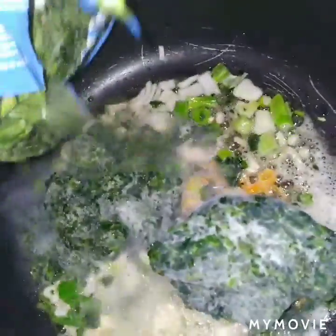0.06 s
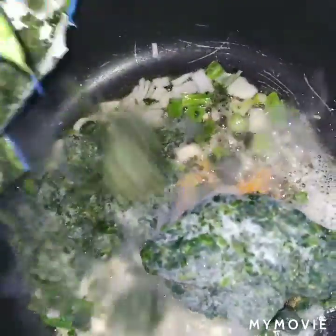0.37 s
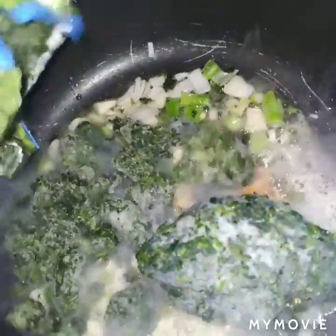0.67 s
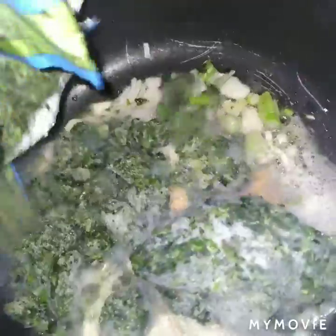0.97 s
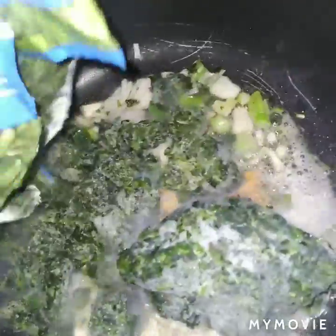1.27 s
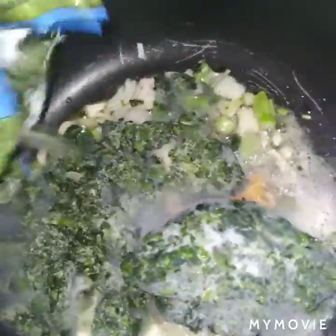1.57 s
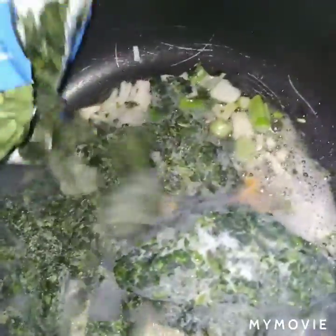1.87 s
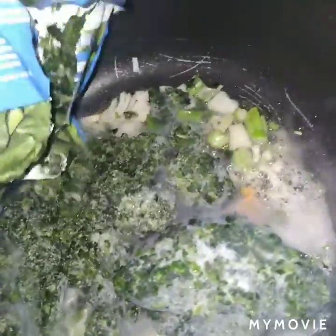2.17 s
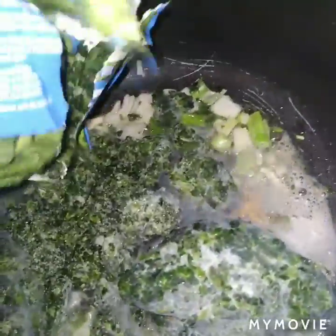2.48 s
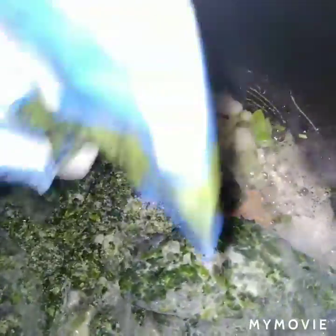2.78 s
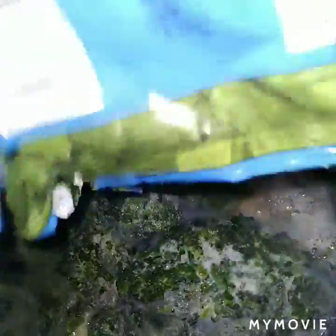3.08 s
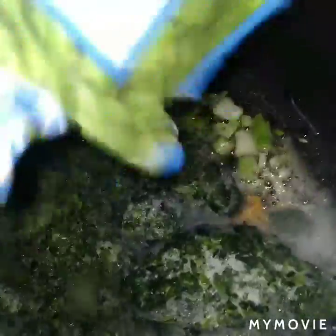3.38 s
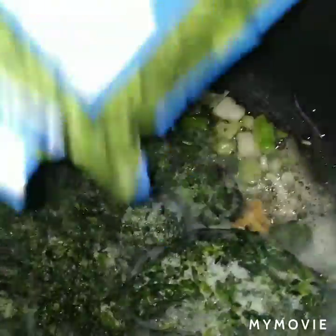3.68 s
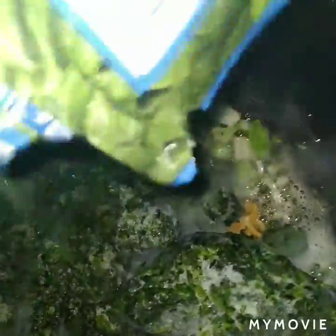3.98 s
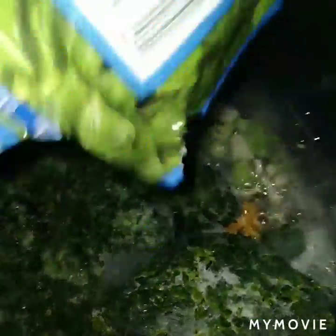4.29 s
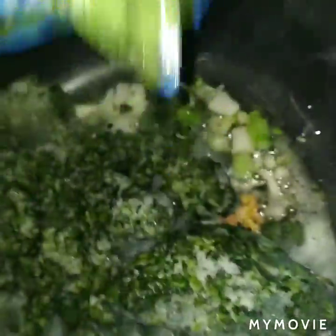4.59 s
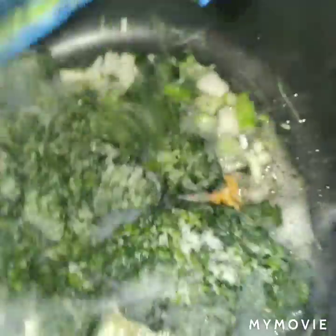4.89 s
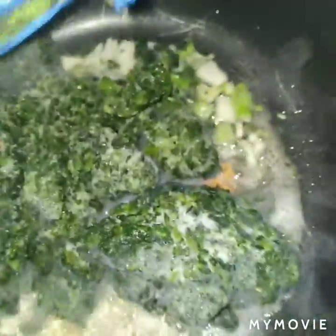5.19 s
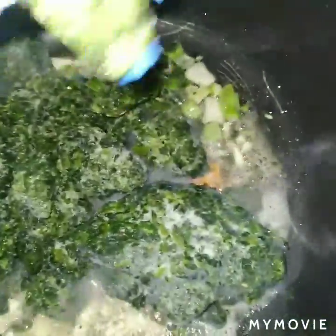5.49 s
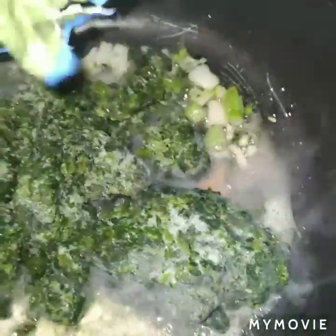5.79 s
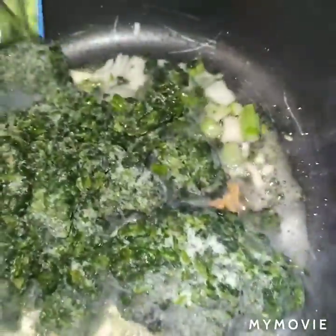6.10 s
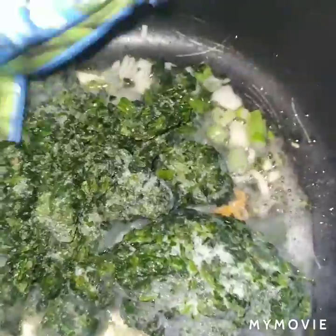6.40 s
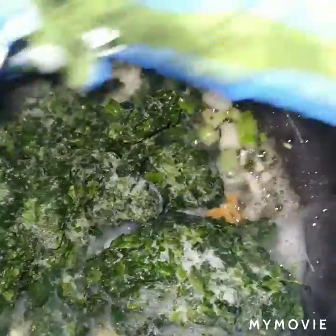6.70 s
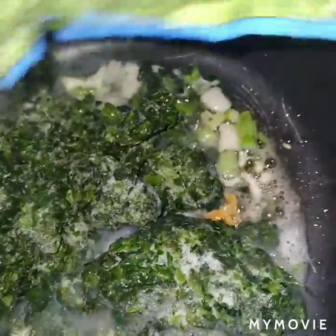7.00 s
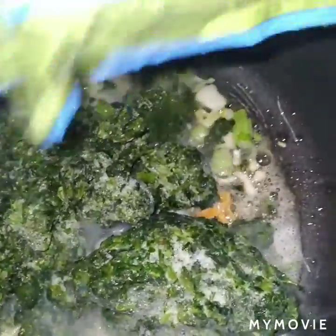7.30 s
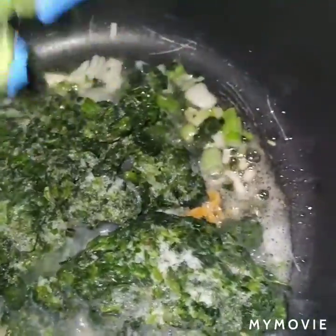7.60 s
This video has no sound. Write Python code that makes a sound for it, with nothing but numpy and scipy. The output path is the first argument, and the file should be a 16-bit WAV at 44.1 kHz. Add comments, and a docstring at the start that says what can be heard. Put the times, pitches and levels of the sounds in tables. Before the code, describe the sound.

Oil sizzles around onions in a pan for the whole eight seconds, a close, fine, high hiss with tiny spits that grows slightly toward 7 seconds. Over it, a plastic bag of frozen spinach is shaken in irregular fits. Sharp crinkles and snaps come from about 0.2 to 0.7 seconds, with several soft, dull knocks as clumps drop around 0.5. Lighter ticks and pats follow. The loudest crackling comes between 2.6 and 3.3 seconds, with low flapping and frozen crumbs scraping and tumbling inside the bag. Gentler shakes and knocks continue until about 4.7, then the bag quietens and the sizzle dominates. Another cluster of rustles, snaps and landing clumps runs from 5.9 to 7 seconds, with a last few snaps and a flap near 7.6. The pan lends a faint hollow ring, and the small kitchen adds a short echo and a very faint low hush.

```python
"""Oil fizzes and spits around onions in a pan, as countless tiny steam bubbles burst.
Frozen spinach is shaken in from a plastic bag, whose creases snap and crinkle as they buckle.
Frozen crumbs scratch and tumble inside the flapping bag, and clumps knock softly against it
and drop into the pan. The hollow of the pan rings along with the bag and the spinach,
and the small kitchen adds a short echo and a low hush."""
import sys
import numpy as np
from scipy import signal
from scipy.fft import rfft, irfft
from scipy.io import wavfile

SR = 44100
rng = np.random.default_rng(int(sys.argv[2]) if len(sys.argv) > 2 else 0)


def master(y):
    """Save y as 16-bit WAV."""
    cut = np.clip(np.atleast_2d(y).T, -1, 1)
    pcm = np.round(cut * 32767)  # scale
    wavfile.write(sys.argv[1], SR, pcm.astype(np.int16))


N = 346185
TIME = np.arange(N) / SR

# The sizzle grows as the spinach thaws: (time [s], level [dB])
SIZZLE_LEVELS = [(0, -50.5), (2.4, -49), (4.6, -47), (7, -46.5), (7.85, -49)]
# Tone of the bubbling oil: (frequency [Hz], relative level [dB])
SIZZLE_TONE = [(290, -49), (500, -7), (638, -39), (863, -18.5), (1200, -20), (1880, -21.5), (2010, -10),
               (2360, -7), (2760, -8.5), (3190, -7.5), (4500, -7), (7030, 5), (9790, 3.5), (11800, -9),
               (15500, -12.5)]
# The louder creases of the bag snap over:
# (time [s], tick level [dB], tick pitch [Hz], panel level [dB], panel pitch [Hz])
SNAPS = [(0.171, -39, 9700, -65, 3200), (0.2, -50, 9000, -48, 3300), (0.206, -25.5, 8900, -35.5, 2150),
         (0.216, -31, 6740, -36, 2250), (0.226, -34, 8160, -53, 2700), (0.243, -28, 8500, -63, 2700),
         (0.3558, -28, 6360, -44, 4100), (0.3639, -32, 6850, -34.5, 2580), (0.4717, -28, 8600, -25, 2540),
         (0.4878, -32, 7100, -61, 2200), (0.508, -36, 7600, -59, 1310), (0.544, -37, 7350, -69, 1700),
         (0.5756, -34, 6840, -77, 1600), (0.58, -28, 7400, -78, 3000), (0.5837, -30.5, 8100, -73, 2300),
         (0.687, -28.5, 7700, -73, 3270), (0.696, -34.5, 8750, -64, 3400), (0.819, -41.5, 9000, -77, 3540),
         (1.055, -35, 6400, -52, 3020), (1.0807, -34, 6470, -75, 1300), (1.129, -38.5, 7900, -70, 2400),
         (1.31, -39.5, 5540, -76, 3000), (1.4215, -28, 6540, -44, 2940), (1.4355, -27.5, 6800, -43.5, 2760),
         (1.69, -37.5, 7150, -49.5, 3700), (1.7121, -35, 6400, -71, 2500), (1.8152, -36, 8700, -49.5, 2500),
         (1.911, -59, 7400, -41, 1740), (2.074, -28.5, 7400, -64, 3100), (2.218, -35.5, 8150, -58, 2800),
         (2.245, -37, 7300, -70, 4000), (2.501, -37, 8700, -34.5, 2200), (2.6951, -37, 7800, -31, 2450),
         (2.706, -29, 6850, -38, 2250), (2.7186, -20.5, 8500, -20.5, 3220), (2.7403, -28, 6700, -41, 2400),
         (2.7496, -26, 6640, -53, 3200), (2.754, -21.5, 8550, -50, 3200), (2.7903, -26.5, 7360, -51, 2000),
         (2.8297, -35, 8100, -48, 1880), (2.8863, -28.5, 7050, -38, 1500), (2.91, -29.5, 8340, -46, 2400),
         (3.004, -44.5, 7500, -36, 1500), (3.108, -41, 7600, -46, 3270), (3.1246, -22, 8860, -37, 2780),
         (3.2166, -24, 7200, -31.5, 3750), (3.2225, -20, 8800, -33.5, 2500),
         (3.2434, -25.5, 9100, -65, 2700), (3.4996, -35.5, 9400, -70, 1500),
         (3.5612, -35, 8440, -34.5, 1900), (3.588, -45, 8200, -42, 1820), (4.174, -38.5, 5900, -40.5, 1660),
         (4.267, -30, 8300, -66, 3600), (4.3357, -34.5, 5660, -48, 3370), (4.4014, -36, 8550, -56, 2500),
         (4.638, -35.5, 7150, -69, 1000), (4.997, -60, 8100, -42, 3250), (5.2167, -62, 7700, -44, 1230),
         (5.709, -58, 7500, -50.5, 2950), (5.9655, -61, 7500, -42, 2000), (6.013, -33, 6500, -30, 1960),
         (6.023, -29, 7900, -30.5, 3000), (6.0472, -37, 6560, -38, 2900), (6.0667, -38, 6000, -28.5, 2100),
         (6.1073, -49, 7540, -33, 1850), (6.1322, -38, 5840, -34.5, 2050), (6.2056, -50, 7160, -38.5, 2060),
         (6.5369, -33.5, 8300, -39, 2580), (6.567, -34.5, 8900, -56, 2580), (6.624, -48, 7400, -33, 3400),
         (6.6346, -53, 6900, -33.5, 1670), (6.677, -61, 8100, -37, 2500), (6.7622, -39, 6100, -33.5, 1820),
         (7.0012, -34, 6440, -39.5, 2600), (7.3767, -39.5, 9400, -48, 1410),
         (7.5193, -43, 7100, -46.5, 2520), (7.555, -26, 7900, -55, 3300), (7.5872, -30, 8300, -55, 3200)]
# Bright tone of the thin plastic: (frequency [Hz], relative level [dB])
PLASTIC_TONE = [(1500, -51), (2600, -28), (4600, -10), (5300, 1.5), (6500, 0.5), (8800, 2.5), (9800, 0),
                (11200, -9.5), (15500, -32)]
# The bag is shaken or shifted:
# (time [s], length [s], rustle level [dB], flap level [dB], tumble level [dB])
SHAKES = [(0.039, 0.0067, -59.5, -49, -66), (0.178, 0.13, -53.5, -70.5, -61), (0.413, 0.14, -82, -55, -56),
          (0.676, .1, -66.5, -62, -82), (0.918, 0.16, -60.5, -69.5, -65), (1.457, 0.085, -72, -71, -68),
          (1.631, 0.08, -57.5, -57.5, -59.5), (1.896, .1, -56, -59, -60.5), (2.374, 0.15, -56, -71, -61),
          (2.632, 0.089, -55, -56, -41.5), (2.691, 0.098, -49.5, -51.5, -47),
          (2.884, 0.025, -58, -48, -45.5), (2.969, 0.064, -52.5, -47, -51.5),
          (3.063, 0.068, -61, -52, -52.5), (3.217, 0.021, -50, -52.5, -49), (3.387, 0.14, -65, -55.5, -59),
          (3.57, 0.18, -59.5, -53.5, -60), (3.77, 0.21, -58.5, -59.5, -61.5),
          (4.124, 0.081, -58, -52.5, -57), (4.447, 0.019, -60, -54.5, -54), (4.586, 0.15, -62.5, -70, -68),
          (4.786, 0.13, -63.5, -78, -75.5), (5.151, 0.042, -53.5, -63.5, -66),
          (5.51, 0.064, -79, -52.5, -68), (5.891, 0.05, -51.5, -65, -66.5), (5.965, 0.14, -42, -48, -49.5),
          (6.125, 0.092, -50.5, -53, -57.5), (6.416, 0.094, -57.5, -57, -58),
          (6.506, 0.095, -49.5, -61, -61.5), (6.631, 0.041, -55, -47.5, -47.5),
          (6.769, 0.0097, -68, -52, -47.5), (6.998, 0.019, -52.5, -50, -48),
          (7.036, 0.27, -66.5, -54, -69.5), (7.602, 0.045, -60, -46, -56), (7.695, 0.039, -74, -53.5, -64)]
# Tone of rustling crumbs and coarse creases: (frequency [Hz], relative level [dB])
RUSTLE_TONE = [(450, -36), (850, 1.5), (1150, -2), (1500, 1.5), (2000, 6), (2600, 2), (3300, -0.5),
               (4300, 0.5), (7000, -43.5)]
# Deep tone of the slack bag flapping: (frequency [Hz], relative level [dB])
FLAP_TONE = [(25, -11), (60, 4.5), (120, -1.5), (240, 1), (350, -12.5), (600, -33.5)]
# Dull tone of crumbs rolling over one another: (frequency [Hz], relative level [dB])
TUMBLE_TONE = [(150, -11), (300, -4), (490, -2), (800, -13.5), (1200, -14), (2000, -35)]
# Soft clumps hit the bag or the pan: (time [s], knock peak [dB], pitch [Hz], pat level [dB])
CLUMPS = [(0.297, -44.5, 214, -52), (0.406, -47, 199, -54), (0.439, -43, 470, -63), (0.481, -35, 162, -35),
          (0.504, -34.5, 600, -35.5), (0.534, -36, 525, -66), (0.557, -33, 496, -70), (0.72, -55, 73, -70),
          (0.773, -49.5, 192, -57), (0.833, -53, 377, -84), (0.986, -45.5, 510, -59),
          (1.078, -44, 500, -58), (1.113, -49, 530, -59), (1.282, -48, 427, -50), (1.494, -57, 190, -56),
          (1.592, -51, 155, -51), (1.657, -57, 73, -49.5), (1.928, -55, 433, -61), (1.962, -48, 410, -61),
          (2.489, -42.5, 393, -54), (2.646, -37, 163, -41), (2.705, -39, 720, -31.5),
          (2.782, -36, 644, -40), (2.89, -41, 450, -43), (2.995, -41, 142, -40.5), (3.068, -45, 183, -45.5),
          (3.173, -48, 280, -58), (3.43, -62, 153, -56), (3.469, -48, 71, -70), (3.526, -48.5, 340, -66),
          (3.654, -44, 178, -43), (3.688, -48, 80, -61), (3.843, -47, 119, -42), (3.887, -45, 218, -64),
          (4.122, -42.5, 87.5, -64), (4.186, -49, 199, -47), (4.438, -52, 475, -55), (4.469, -53, 80, -64),
          (4.636, -47, 490, -58), (5.161, -56, 373, -58), (5.497, -47, 141, -73), (5.55, -46, 113, -56),
          (5.967, -41.5, 830, -38), (6.067, -41, 250, -35), (6.107, -38, 250, -36), (6.321, -50, 516, -54),
          (6.618, -40.5, 380, -37), (6.658, -40, 212, -34.5), (6.707, -46, 366, -63), (6.759, -39, 94, -36),
          (6.78, -40, 723, -35), (6.987, -40.5, 110, -64), (7.191, -41, 101, -75), (7.265, -44.5, 185, -72),
          (7.396, -49, 102, -73), (7.601, -43, 113, -46.5)]
# Pitches at which the hollow of the pan rings: (pitch [Hz], width [Hz], gain [dB])
PAN_RINGS = [(377.3, 21, -5), (493, 11.7, -15.5), (766, 45, -1), (1233, 23, -31), (1972, 23, -13.5),
             (2140, 15, -28), (3217, 27, -9.5)]
# Tone of the room's low hush: (frequency [Hz], relative level [dB])
HUSH_TONE = [(18, -89), (30, -3), (81, -20), (244, 1), (307, -35), (580, 15), (662, 0), (1500, 7),
             (1950, -37), (3300, -120)]


def frying():
    """Countless tiny steam bubbles burst in the oil; now and then a larger one spits."""
    bubbles_per_s = 12000 * from_db(2.1 * drift(25))
    fizz = grains(bubbles_per_s, spread_db=2.5, low_hz=600, high_hz=17600, cycles=7.3)
    spits = grains(per_s=260, spread_db=4.4, low_hz=5600, high_hz=10500, cycles=4, count=8)
    loudness = from_db(np.interp(TIME, *np.transpose(SIZZLE_LEVELS)))
    return loudness * colour(fizz + from_db(-9) * spits, SIZZLE_TONE)


def bag_snaps():
    """A buckling crease cracks, ticks with a short ring, and jolts the panel of plastic around it."""
    out, plastic = np.zeros(N), tone_filter(PLASTIC_TONE, size=256)
    for s, tick_db, tick_hz, panel_db, panel_hz in SNAPS + neighbour_snaps():
        slip = at_level(burst(decay_s=0.0012, rise_s=0.00021), 0)
        ring = at_level(burst(decay_s=0.027, rise_s=0.00067), -7)
        tick = resonance(signal.lfilter(plastic, [1], slip + ring), tick_hz, width_hz=1300)
        jolt = burst(decay_s=0.0014, rise_s=0.00039)
        panel = resonance(resonance(jolt, panel_hz, width_hz=580), panel_hz, width_hz=3000)
        crack_db = (tick_db + min(panel_db, tick_db)) / 2 - 10
        crack = at_level(burst(decay_s=0.00017, rise_s=0.00005), crack_db)
        # Stiff, high-pitched creases also spit in the top treble, at most as loud as their tick.
        edge = resonance(burst(decay_s=0.0018, rise_s=0.0005), hz=13000, width_hz=5000)
        edge_db = tick_db + min(-13.5 + 48 * np.log2(tick_hz / 8570), 0)
        add(out, s, at_level(tick, tick_db) + at_level(panel, panel_db) + at_level(edge, edge_db))
        add(out, s, crack)
    return out


def neighbour_snaps():
    """A weaker crease gives way just before or after each snap, at a slightly different pitch."""
    rows, chances = [], rng.uniform(-1, 1, (len(SNAPS), 3))
    for (s, tick_db, tick_hz, panel_db, panel_hz), (late, hard, high) in zip(SNAPS, chances):
        delay_s = np.interp(late, [-1, 1], [-0.014, 0.028])
        gain_db = -13.5 + 2.5 * hard
        detune = 1 + 0.13 * high
        rows.append((s + delay_s, tick_db + gain_db, tick_hz * detune,
                     panel_db + gain_db, panel_hz * detune))
    return rows


def bag_crinkle():
    """Showers of smaller creases surround the snaps: fine bright ones and a coarser crunch."""
    fine = grains(per_s=2900, spread_db=5.5, low_hz=2500, high_hz=13000, cycles=9)
    coarse = grains(per_s=880, spread_db=-1.0, low_hz=600, high_hz=4730, cycles=1.6)
    tick_strain = strain(column=1, lead_s=0.007, fade_s=0.022)
    panel_strain = strain(column=3, lead_s=0.0016, fade_s=0.0037)
    shower = from_db(-11) * tick_strain * colour(fine, PLASTIC_TONE)
    crunch = from_db(-7.5) * panel_strain * colour(coarse, RUSTLE_TONE)
    return shower + crunch


def strain(column, lead_s, fade_s):
    """The plastic tightens just before each snap and relaxes after it, more so for a strong snap."""
    power = np.zeros(N)
    for snap in SNAPS:
        power[round(snap[0] * SR)] = from_db(snap[column]) ** 2
    after = signal.lfilter([1], [1, -np.exp(-2 / (fade_s * SR))], power + 1e-18)
    before = signal.lfilter([1], [1, -np.exp(-2 / (lead_s * SR))], power[::-1] + 1e-18)[::-1]
    return np.sqrt(after + before)


def pouring():
    """Frozen crumbs scratch along the plastic and tumble over one another, while the slack bag flaps."""
    scratches = grains(750 * from_db(4.2 * drift(45)), spread_db=2, low_hz=600, high_hz=3700, cycles=9.1)
    bumps = grains(380 * from_db(4.2 * drift(35)), spread_db=4, low_hz=250, high_hz=1500, cycles=8.9)
    flaps = grains(per_s=410, spread_db=1, low_hz=35.6, high_hz=477, cycles=5.6)
    rustle = shaking(column=2, held_db=-69.5) * colour(scratches, RUSTLE_TONE)
    flap = shaking(column=3, held_db=-73) * colour(flaps, FLAP_TONE)
    tumble = shaking(column=4, held_db=-77) * colour(bumps, TUMBLE_TONE)
    jostle = rms_one(from_db(3.5 * drift(30)))   # the contents move in fits
    return jostle * (rustle + tumble + flap)


def shaking(column, held_db):
    """Each shake swells quickly, holds and dies away; in between, the held bag is never quite still."""
    rise_s, fade_s = 0.019, 0.0094
    power = from_db(held_db) ** 2
    for shake in SHAKES:
        start_s, length_s = shake[:2]
        rise = np.clip(1 + (TIME - start_s) / rise_s, 0, 1)
        fade = np.exp(-np.clip((TIME - start_s - length_s) / fade_s, 0, 20))
        power = power + (from_db(shake[column]) * rise * fade) ** 2
    return np.sqrt(power)


def falling_clumps():
    """Each clump gives a dull knock that dies quickly, and a pat as its loose crumbs land."""
    out, crumbs = np.zeros(N), tone_filter(RUSTLE_TONE, size=512)
    for s, peak_db, hz, pat_db in CLUMPS:
        settling = burst(decay_s=1 / hz, rise_s=0.00023, size=8192)   # big, low clumps touch for longer
        push = signal.unit_impulse(len(settling)) + 0.7 * settling / np.linalg.norm(settling)
        knock = resonance(resonance(push, hz, width_hz=45 + 0.04 * hz), hz, width_hz=0.79 * hz)
        landing = burst(decay_s=0.0082, rise_s=0.00032)
        pat = resonance(signal.lfilter(crumbs, [1], landing), hz=1000, width_hz=500)
        add(out, s, from_db(peak_db) * knock / np.abs(knock).max())
        add(out, s, at_level(pat, pat_db))
    return out


def pan_hollow(x):
    """The hollow of the pan rings along with a sound made above it."""
    return x + sum(from_db(db) * resonance(x, hz, width_hz) for hz, width_hz, db in PAN_RINGS)


def kitchen_echo(x, fade_s=0.27):
    """Sound bounces between close walls, dying away by 60 dB in fade_s."""
    t = TIME[:SR // 2]
    tail = rng.standard_normal(len(t)) * from_db(-60 * t / fade_s) * (1 - np.exp(-t / 0.00066))
    return signal.oaconvolve(x, tail / np.sqrt(np.sum(tail ** 2)))[:N]


def room_hush():
    """A faint, low, steady noise fills the room."""
    return from_db(-80) * colour(rng.standard_normal(N), HUSH_TONE)


def grains(per_s, spread_db, low_hz, high_hz, cycles, count=16):
    """About per_s random clicks a second, uneven in size, each ringing at one of `count` pitches."""
    sizes = from_db(spread_db * np.minimum(rng.exponential(1, N), 4.2)) * rng.choice([-1, 1], N)
    clicks = sizes * (rng.random(N) < per_s / SR)
    choice = rng.integers(0, count, N)
    pitches = np.geomspace(low_hz, high_hz, count)
    rings = (resonance(clicks * (choice == k), hz, 2 * hz / cycles) for k, hz in enumerate(pitches))
    return rms_one(sum(rings))


def burst(decay_s, rise_s, size=2048):
    """A quick swell of tiny random pushes that dies away."""
    t = TIME[1:size + 1]
    return rng.standard_normal(size) * np.exp(-t / decay_s) * (1 - np.exp(-t / rise_s))


def drift(turns_per_s):
    """A random curve that wanders around zero, typically by about 1."""
    return rms_one(np.interp(TIME * turns_per_s, np.arange(4096), rng.standard_normal(4096)))


def resonance(x, hz, width_hz):
    """Make a sound ring at one pitch; the narrower the width, the longer the ring."""
    r = np.exp(-np.pi * width_hz / SR)
    feedback = [1, -2 * r * np.cos(2 * np.pi * hz / SR), r * r]
    return signal.lfilter(np.array([1, 0, -1]) * (1 - r * r) / 2, feedback, x + 1e-18)


def tone_filter(tone, size=4096):
    """Turn a tone table into a filter that answers as early as it can (minimum phase)."""
    hz, db = np.transpose(tone)
    grid_hz = np.maximum(np.arange(size // 2 + 1) * SR / size, 1)
    gains = from_db(np.interp(np.log(grid_hz), np.log(hz), db))
    cepstrum = irfft(np.log(gains))
    cepstrum[1:size // 2] *= 2   # fold the part before time zero onto the part after it
    cepstrum[size // 2 + 1:] = 0
    return irfft(np.exp(rfft(cepstrum)))


def colour(x, tone):
    """Give a sound the tone in a table, at an average strength of 1."""
    return rms_one(signal.oaconvolve(x, tone_filter(tone))[:len(x)])


def from_db(db):
    """Turn decibels into a number to multiply by."""
    return 10 ** (np.asarray(db) / 20)


def rms_one(x):
    """Scale a signal to an average strength (root mean square) of 1."""
    return x / np.sqrt(np.mean(x ** 2) + 1e-20)


def at_level(x, db):
    """Scale a short sound so that its energy, spread over 3 ms, has this level."""
    return from_db(db) * x * np.sqrt(0.003 * SR / np.sum(x ** 2))


def add(out, s, sound):
    """Mix a sound in at s seconds."""
    start = int(np.clip(s * SR, 0, N - 1))
    out[start:start + len(sound)] += sound[:N - start]


def scene():
    """Pan, bag and spinach close by, over the echo and low hush of the kitchen."""
    sizzle = frying()
    bag = pan_hollow(bag_snaps() + bag_crinkle())
    spinach = pan_hollow(pouring() + falling_clumps())
    echo = kitchen_echo(from_db(-18) * sizzle + from_db(-10) * bag + from_db(-11.5) * spinach)
    return (sizzle + bag + spinach + echo + room_hush())[None]


def record(dry):
    """The microphone loses the deepest bass; the highest treble is cut steeply."""
    bass_cut = signal.butter(2, 34, "high", fs=SR, output="sos")
    treble_cut = signal.ellip(10, 0.2, 70, 15750, fs=SR, output="sos")
    return signal.sosfilt(treble_cut, signal.sosfilt(bass_cut, dry))


dry = scene()
out = record(dry)
master(out)
```